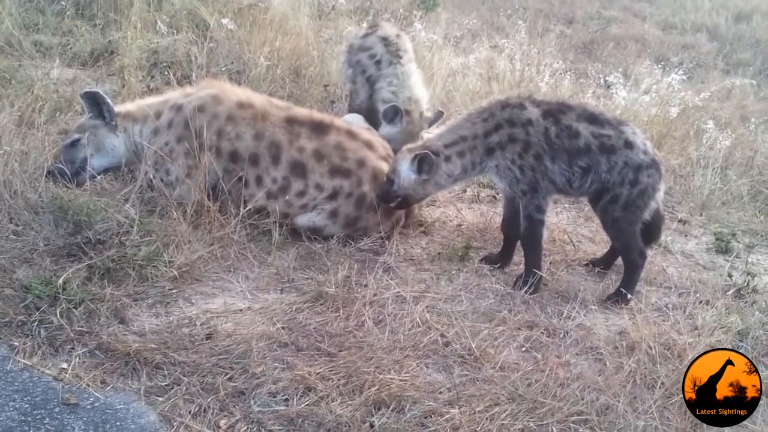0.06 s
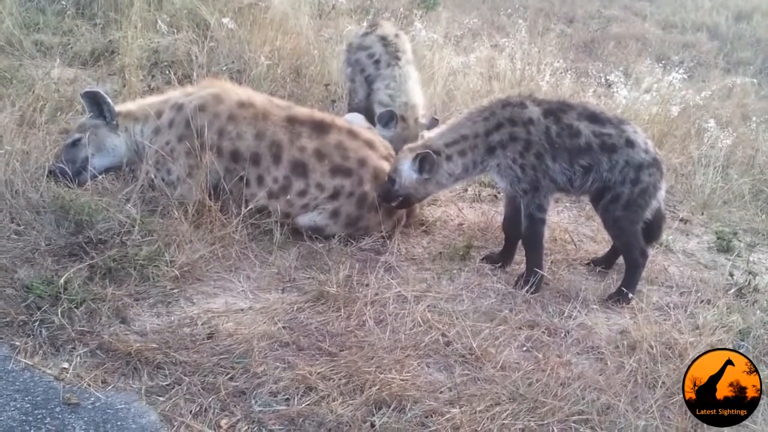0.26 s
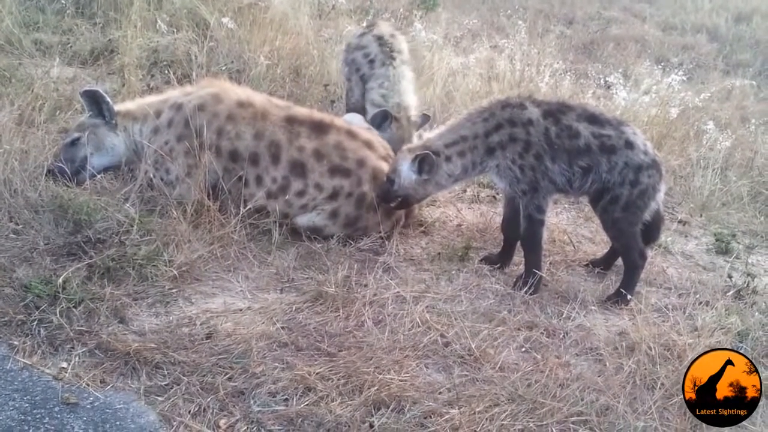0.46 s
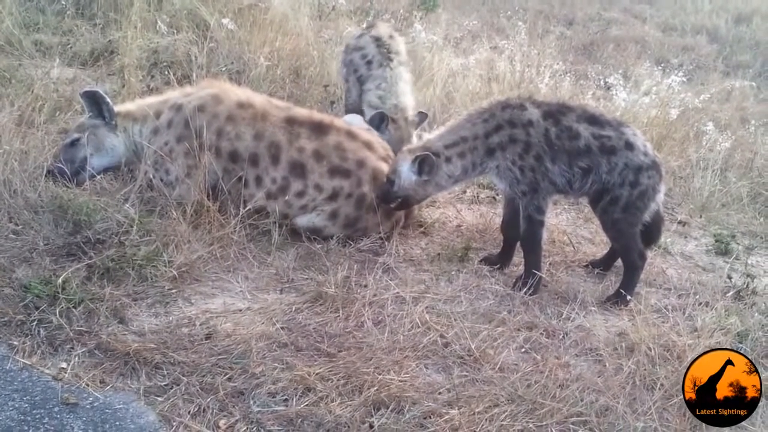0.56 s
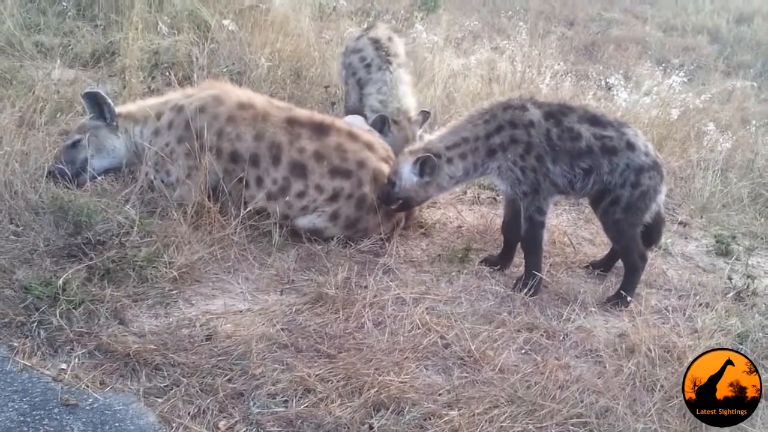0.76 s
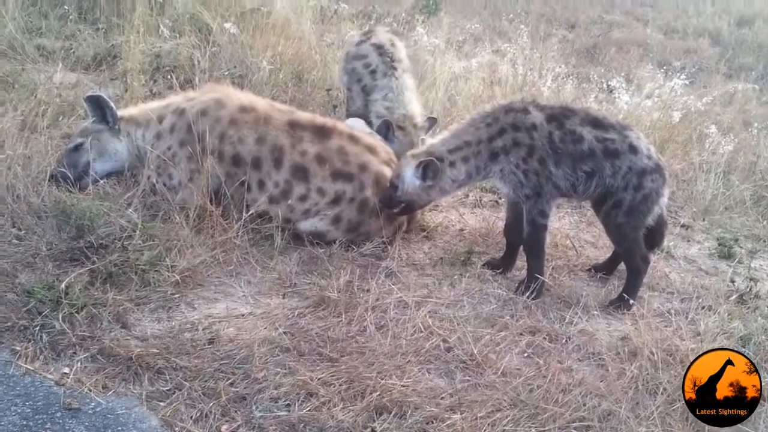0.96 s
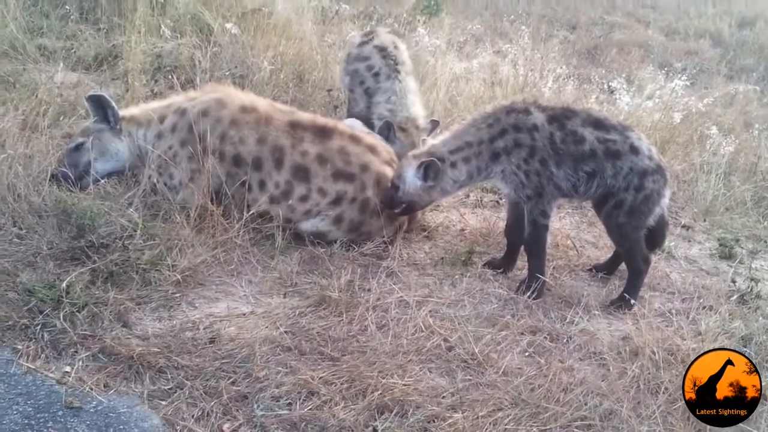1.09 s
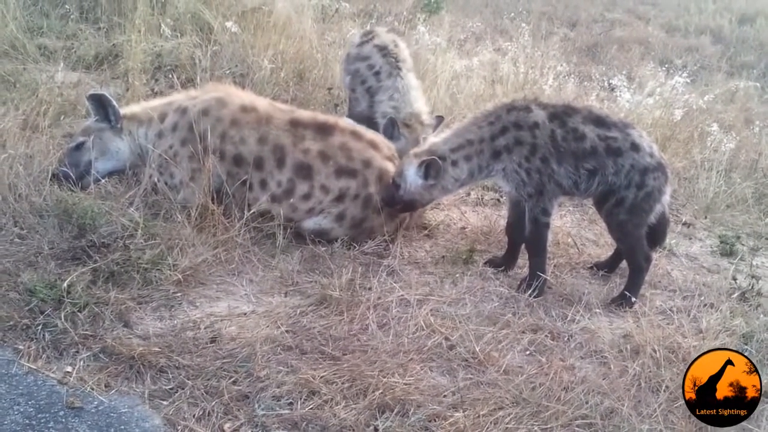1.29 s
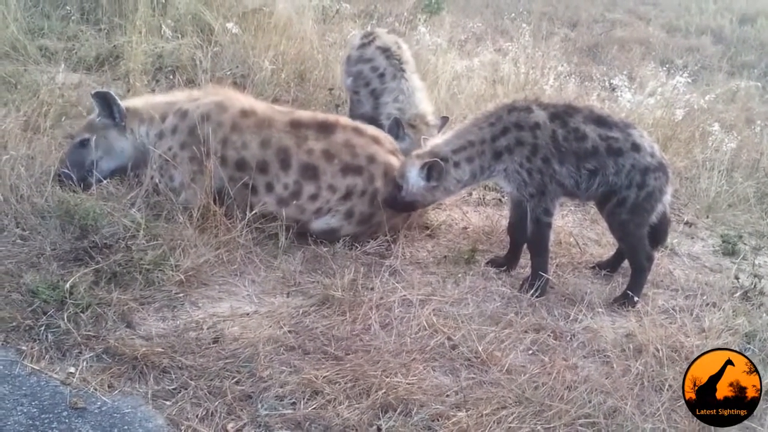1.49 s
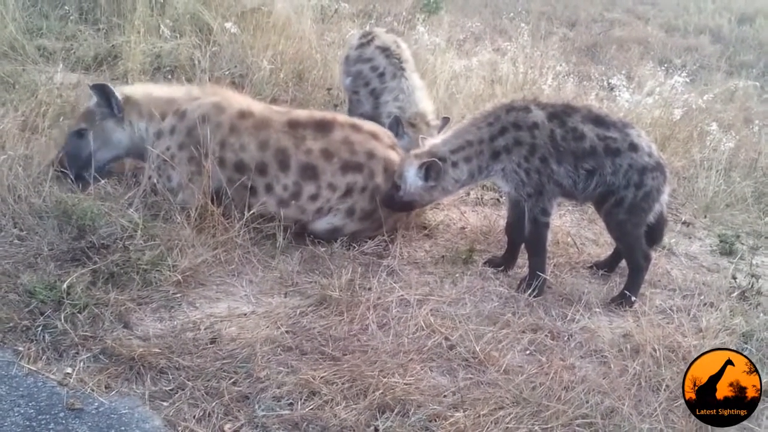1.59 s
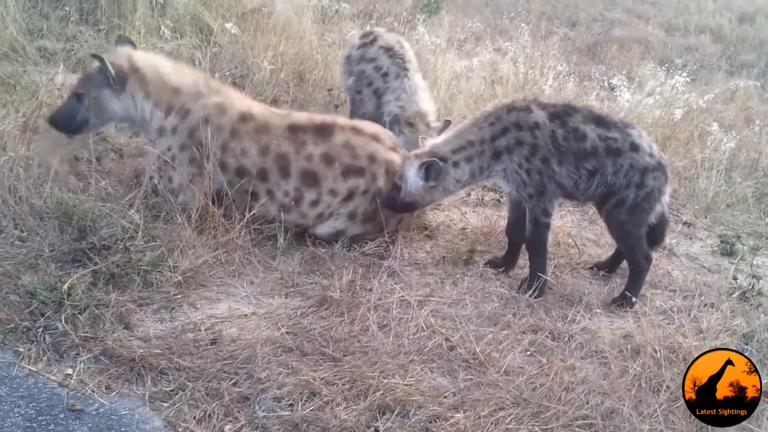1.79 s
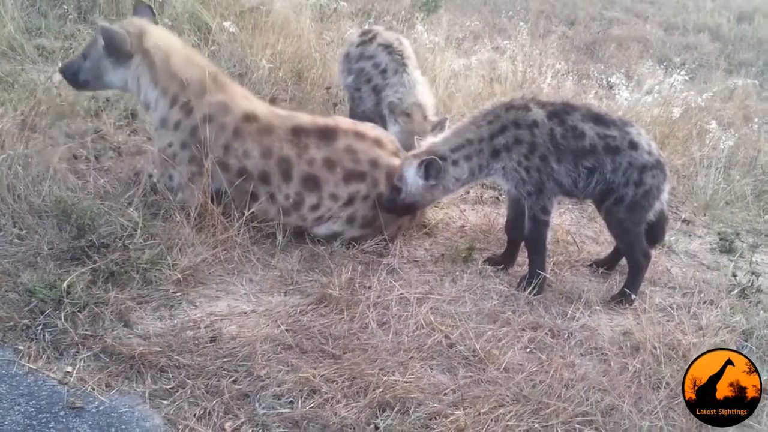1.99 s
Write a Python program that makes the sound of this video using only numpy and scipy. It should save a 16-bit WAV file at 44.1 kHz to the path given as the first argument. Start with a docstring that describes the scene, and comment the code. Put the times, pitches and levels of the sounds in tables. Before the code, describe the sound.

A hyena's squeal begins at once, rough and briefly dipping, then climbs from about 0.1 to 0.45 seconds. It grows loudest around 0.7 to 1.3, a clear, piercing, slightly hoarse tone slowly sagging in pitch, with a bright overloaded edge. It drops sharply and breaks off near 1.47. Dry, quiet open air remains, with a faint distant bird's quick chip and short whistle around 1.8 to 1.97.

```python
"""A spotted hyena close by gives one long, loud squeal in dry open bush, over still air.
The pitch climbs out of a rough start, holds clean while it sags, then drops as the cry breaks off.
Overtones shaped by throat and ground reflection, hoarse noise and a bright overload edge make the squeal.
Grass and scrub answer it faintly, as fading noise tails.
Afterwards a far bird gives a quick chip and a short whistle, made of sliding sines with an airy edge."""
import sys
import numpy as np
from scipy import signal
from scipy.fft import rfft, irfft, next_fast_len
from scipy.io import wavfile
from scipy.ndimage import uniform_filter1d, minimum_filter1d, map_coordinates

SR = 44100
rng = np.random.default_rng(int(sys.argv[2]) if len(sys.argv) > 2 else 0)


def to_wav(s):
    """Save 16-bit WAV."""
    ch = np.atleast_2d(s).T  # columns
    pcm = np.round(np.clip(ch, -1, 1) * 32767)  # PCM
    wavfile.write(sys.argv[1], SR, pcm.astype(np.int16))


N = 90404  # length of the scene [samples]
CUTOFF_HZ = 14800  # nothing is kept from here up
SCRUB_T60_S = 0.73  # time for the scrub's answer to fall by 60 dB


def amp(db):
    """Turn decibels into a gain."""
    return 10 ** (np.asarray(db) / 20)


def unit(x):
    """Scale to an average (rms) strength of 1."""
    return x / np.sqrt(np.mean(x ** 2) + 1e-20)


def curves(rows):
    """Draw straight lines through a table: one value per sample for each column after the time."""
    times, *columns = np.transpose(rows)
    return [np.interp(np.arange(N) / SR, times, column) for column in columns]


def wobble(rate):
    """A smooth random curve through `rate` random points a second."""
    points = rng.standard_normal(N // 8)
    return map_coordinates(points, [np.arange(N) * rate / SR + 2])


def along(points, hz, axis=1):
    """Read one column of a spectrum table, with frequency on a log scale as the ear hears it."""
    columns = np.transpose(points)
    return np.interp(np.log(hz + 1), np.log(columns[0] + 1), columns[axis])


def filtered(x, response):
    """Multiply the spectrum of x by a response that depends on frequency."""
    size = next_fast_len(N + SR // 2)
    spectrum = rfft(x, size) * response(np.fft.rfftfreq(size, 1 / SR))
    return irfft(spectrum, size)[..., :N]


def noise(spectrum, alike):
    """Coloured stereo noise of rms 1; alike is the share of power common to both sides."""
    share = np.clip(alike, 0, 1)
    common = np.sqrt(share) * rng.standard_normal(N)
    separate = np.sqrt(1 - share) * rng.standard_normal((2, N))
    return unit(filtered(common + separate, lambda hz: amp(along(spectrum, hz))))


def echo(x, t60):
    """Many blurred reflections: x smeared by fading stereo noise, scaled to unit energy on the left."""
    t = np.arange(SR // 2) / SR
    tail = rng.standard_normal((2, len(t))) * amp(-60 * t / t60)
    return signal.fftconvolve(np.atleast_2d(x), tail / np.linalg.norm(tail[0]), axes=1)[:, :N]


def still_air():
    """The quiet background of the open bush: steady, coloured noise, mostly different on each side."""
    # colour of the air noise: (frequency [Hz], relative level [dB])
    air_colour = [(15, -43), (25, -16), (38, -2), (135, -9), (655, -11.5), (749, -14.5), (1420, -13),
                  (1960, -19.5), (2180, -17.5), (6040, -19.5), (13800, -26), (15000, -37)]
    return amp(-53.5) * noise(air_colour, alike=0.23)


def bird():
    """A far bird: a quick chip and a longer, slightly airy whistle, each sliding down onto its note."""
    # the notes: (time [s], length [s], first pitch [Hz], last pitch [Hz], level [dB])
    notes = [(1.785, .012, 3640, 3100, -50.5), (1.799, 0.17, 2700, 2510, -51.5)]
    # colour of the whistle's airy edge: (frequency [Hz], relative level [dB])
    breath_colour = [(1800, -48), (2400, -13.5), (2900, 4), (3300, 0), (3700, -26), (5000, -44)]
    slide_s, waver_share, swell_power = .005, .003, .6
    breath_db, echo_db = -9, -5.5  # breath against the whistle, echo against the bird
    out = np.zeros((2, N))
    for start, length, first_hz, last_hz, level_db in notes:
        t = np.maximum(np.arange(N) / SR - start, 0)
        hz = last_hz + (first_hz - last_hz) * np.exp(-t / slide_s)
        hz = hz * (1 + waver_share * wobble(260))
        swell = np.abs(np.sin(np.pi * t / length)) ** swell_power * (t < length)
        whistle = np.sin(2 * np.pi * np.cumsum(hz) / SR)
        breath = amp(breath_db) * noise(breath_colour, alike=0.44)
        out += amp(level_db) * swell * (whistle + breath)
    return out + amp(echo_db) * echo(out, SCRUB_T60_S)


def grass_and_scrub(cry):
    """Stems and leaves scatter the cry: a very short answer from grass, a longer, fainter one from scrub."""
    grass = amp(-16) * echo(cry, t60=.04)
    scrub = amp(-33.5) * echo(cry, SCRUB_T60_S)
    return grass + scrub


def throat_and_ground(size=4096):
    """Throat resonances and ground reflection together colour the sound: gain [dB] and phase per port."""
    # throat resonances together with the ground reflection strengthen some frequencies and weaken others,
    # differently at each microphone port: (frequency [Hz], left level [dB], right level [dB])
    path_levels = [(150, -58.5, -62), (390, -27, -25.5), (650, -23.5, -23.5), (724.5, -26, -37),
                   (851, -12, -11), (1230, -4, -9.5), (1293, -34, -22.5), (1514, -18, -31.5),
                   (1840, -12, -23.5), (1945, -34, -13), (2100, -17, -3.5), (2396.4, 2.5, -8),
                   (2553, -13.5, -25), (2652, -19.5, -13), (2903, -7, -6.5), (3120, -5.5, -12.5),
                   (3485, -30, -23.5), (3665, -17.5, -21.5), (3980.0, -8, -14), (4117, -18.5, -9),
                   (4277, -34, -32.5), (4592, -15.5, -38), (4675, -8.5, -35), (4918, -16, -33),
                   (4975, -42, -12.5), (5453, -26.5, -45), (6080, -15, -16.5), (6273, -29, -30),
                   (6696, -19, -20.5), (7430, -36, -47.5), (7330, -28.5, -35), (7960, -36.5, -36),
                   (11700, -45.5, -49), (15000, -64, -48)]
    hz = np.fft.rfftfreq(size, 1 / SR)
    db = np.array([along(path_levels, hz, axis=1), along(path_levels, hz, axis=2)])
    # the phase follows from the gain, because the answer cannot come before the sound that drives it
    cepstrum = irfft(np.log(amp(db)))
    return hz, db, rfft(2 * cepstrum[:, :size // 2], size).imag


def overtones(pitch, cycle, bright, shift, count=24):
    """Multiples of the pitch slide through the colouring; gives the body and the bright overload edge."""
    pivot_hz, edge_from_hz = 2500, 8500  # brightness tilts about the first; the edge starts at the second
    grid, ports_db, ports_phase = throat_and_ground()
    number = np.arange(1, count + 1)[:, None]
    hz = number * pitch
    place = hz / (1 + shift / 100)  # moving the colouring up = reading it lower down
    tilt_db = bright * np.log2(hz / pivot_hz)
    gains = np.array([amp(np.interp(place, grid, db) + tilt_db) for db in ports_db])
    gains = gains * (hz < CUTOFF_HZ)
    waves = np.array([np.cos(number * cycle + np.interp(place, grid, phase)) for phase in ports_phase])
    edge_share = np.clip((hz - edge_from_hz) / pitch + .5, 0, 1)

    def steady(g):
        """Add up the multiples and divide by their power averaged over both sides."""
        power = (g ** 2).sum(1).mean(0) / 2
        return (g * waves).sum(1) / np.sqrt(power + 1e-12)

    return steady(gains * (1 - edge_share)), steady(gains * edge_share)


def squeal_tone():
    """Beating vocal folds give the body of overtones; recorder overload adds the bright edge above it."""
    # pitch of the squeal before smoothing and jitter: (time [s], pitch [Hz])
    pitch_path = [(0.0, 480), (0.04, 441.6), (0.09, 499), (0.138, 594.4), (0.155, 658.2), (0.2, 720.3),
                  (0.25, 770.7), (0.31, 801.9), (0.4, 836), (0.46, 847.2), (0.53, 837.6), (0.64, 804.7),
                  (0.86, 771.1), (0.97, 764.9), (1.15, 722.4), (1.27, 712.9), (1.33, 692.4), (1.37, 664.7),
                  (1.405, 575.3), (1.44, 406.6), (1.47, 379.6)]
    # level of the body of overtones before shimmer: (time [s], level [dB])
    level_path = [(0, -18.5), (.01, -27.5), (.04, -40.5), (.08, -35), (.135, -20.5), (.148, -19.5),
                  (.172, -18), (.22, -10.5), (.35, -11), (.41, -14), (.53, -12.5), (.6, -10), (.68, -4.5),
                  (.83, -4.5), (1.31, -5.5), (1.398, -12.5), (1.421, -18), (1.432, -31), (1.445, -23.5),
                  (1.454, -37.5), (1.47, -52)]
    # level of the bright overload edge above 8.5 kHz, at multiples of the squeal's pitch,
    # before shimmer: (time [s], level [dB])
    edge_path = [(0, -70.5), (.1, -70), (.25, -55.5), (.44, -42.5), (.58, -48), (.68, -54), (.83, -41),
                 (1.05, -39.5), (1.28, -41), (1.38, -52), (1.44, -74)]
    # changing state of the squeal:
    # (time [s], brightness [dB per octave], shift of the colouring [%], pitch jitter [share])
    squeal_state = [(0.0, -2.5, -1.7, 0.0089), (0.05, 4, -1.6, 0.0069), (0.12, 0.7, -0.37, 0.014),
                    (0.16, -0.3, 1, 0.0052), (0.22, 0.3, -0.99, 0.0028), (0.32, 2.5, -0.4, 0.001),
                    (0.47, 4, 0.5, 0.00041), (0.65, 2.3, -0.79, 0.0011), (0.9, 0.44, 0.25, 0.0007),
                    (1.1, -0.1, 0.2, 0.00088), (1.25, -1.6, 0.96, 0.00086), (1.35, -0.9, -1.3, 0.0016),
                    (1.4, -1.5, 0.0, 0.004), (1.445, -11, -0.92, 0.008)]
    jitter_per_s, flutter_per_s = 350, 45  # random points a second
    flutter_share, shimmer_db = 0.00095, 0.75  # slow unsteadiness of pitch and of level
    pitch = uniform_filter1d(curves(pitch_path)[0], size=700)
    (level_db,), (edge_db,) = curves(level_path), curves(edge_path)
    bright, shift, jitter = curves(squeal_state)
    unsteady = 1 + jitter * wobble(jitter_per_s) + flutter_share * wobble(flutter_per_s)
    cycle = 2 * np.pi * np.cumsum(pitch * unsteady) / SR
    body, edge = overtones(pitch, cycle, bright, shift)
    shimmer = amp(shimmer_db * wobble(flutter_per_s))
    return (amp(level_db) * body + amp(edge_db) * edge) * shimmer, cycle


def hoarseness(cycle):
    """Rough noise in the voice: a low rasp, and a hiss that swells once per cycle of the folds."""
    # levels before their random swing: (time [s], low rasp level [dB], hiss level [dB])
    roughness = [(0, -47, -30.5), (.04, -59, -55), (.095, -48.5, -38), (.125, -47.5, -43.5),
                 (.15, -39, -27), (.22, -36, -33), (.32, -58, -34), (.4, -48, -41.5), (.48, -40, -28),
                 (.53, -41.5, -32), (.73, -36.5, -28.5), (.9, -42, -33), (1.05, -36, -35),
                 (1.15, -40, -36.5), (1.29, -45, -32.5), (1.36, -38.5, -34), (1.41, -45.5, -38),
                 (1.445, -42.5, -50), (1.465, -55, -70)]
    # colour of the rasp: (frequency [Hz], relative level [dB])
    rasp_colour = [(150, -52.5), (300, -31.5), (500, -22.5), (920, -20.5), (1090, -2.5), (1270, -2),
                   (1400, -20.5), (1750, -11), (2100, 5), (2600, -1.5), (4000, -32.5)]
    # colour of the hiss: (frequency [Hz], relative level [dB])
    hiss_colour = [(900, -55), (1650, -25), (2200, -7.5), (2900, 3), (3800, 4.5), (4500, -3), (5300, -4.5),
                   (6000, 0), (6800, -1), (7500, -7.5), (8300, -14), (15000, -35.5)]
    swing_db, swing_per_s, pulsing = 1.9, 35, 0.21
    rasp_db, hiss_db = curves(roughness)
    rasp = noise(rasp_colour, alike=0.51)
    hiss = unit(noise(hiss_colour, alike=0.17) * (1 + pulsing * np.cos(cycle)))
    rasp_gain = amp(rasp_db + swing_db * wobble(swing_per_s))
    hiss_gain = amp(hiss_db + swing_db * wobble(swing_per_s))
    return rasp_gain * rasp + hiss_gain * hiss


def hyena():
    """The squeal: its pitched tone plus hoarse noise, dying away quickly at the end."""
    end_s, release_s = 1.47, 0.028
    tone, cycle = squeal_tone()
    release = np.exp(-np.maximum(np.arange(N) / SR - end_s, 0) / release_s)
    return release * (tone + hoarseness(cycle))


def scene():
    """Still air, the far bird, and the squeal with its reflections."""
    cry = hyena()
    return still_air() + bird() + grass_and_scrub(cry) + cry


def record(dry):
    """The camera limits and rounds off the highest peaks, and keeps nothing above its band limit."""
    ceiling, overload, knee_order = 1.25, .99, 12  # a higher order bends more sharply
    needed = ceiling / np.maximum(np.abs(dry), ceiling)
    # hold the gain down around each peak, then smooth it
    held = dry * uniform_filter1d(minimum_filter1d(needed, size=900), size=700)
    rounded = held / (1 + np.abs(held / overload) ** knee_order) ** (1 / knee_order)
    return filtered(rounded, lambda hz: hz < CUTOFF_HZ)


dry = scene()
out = record(dry)
to_wav(out)
```